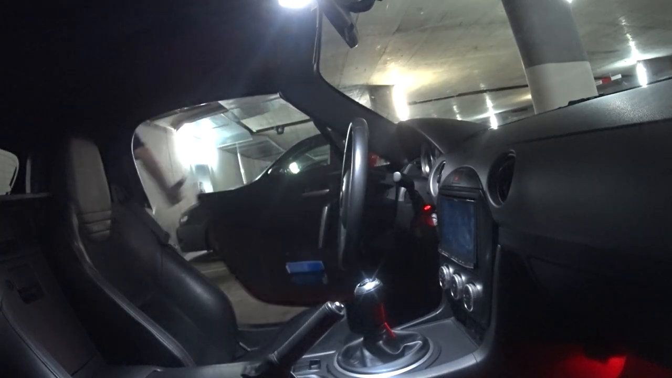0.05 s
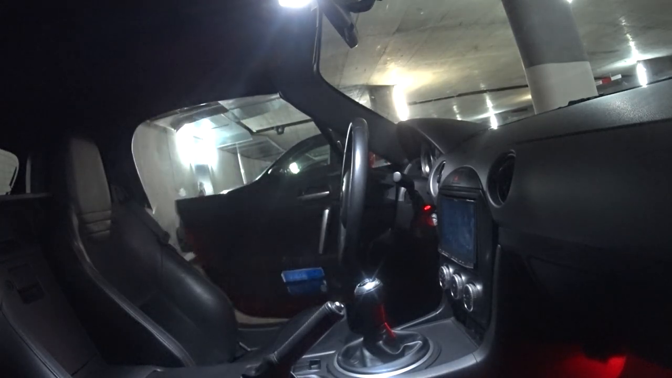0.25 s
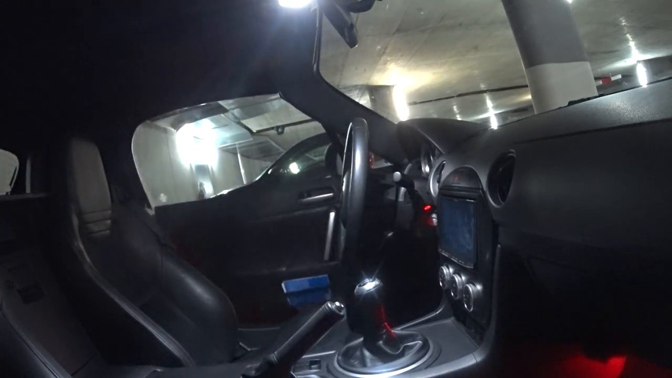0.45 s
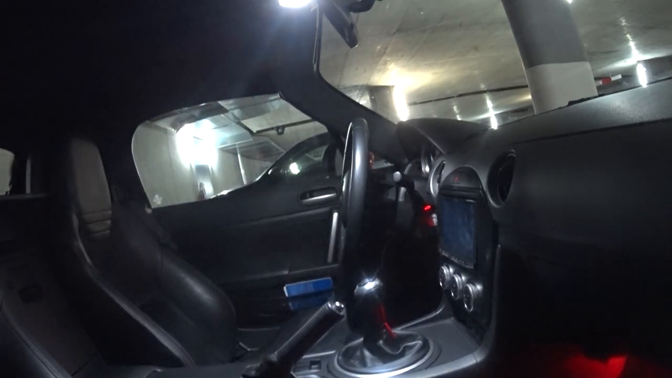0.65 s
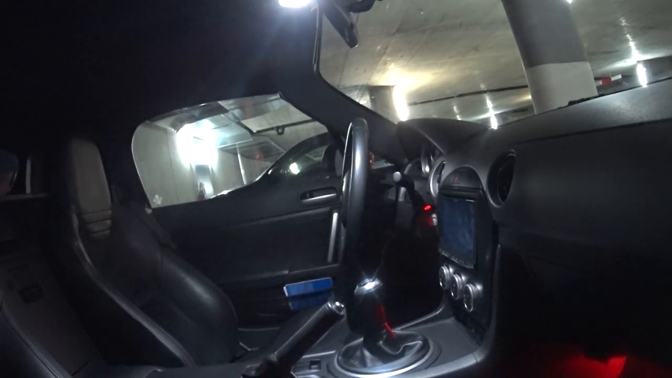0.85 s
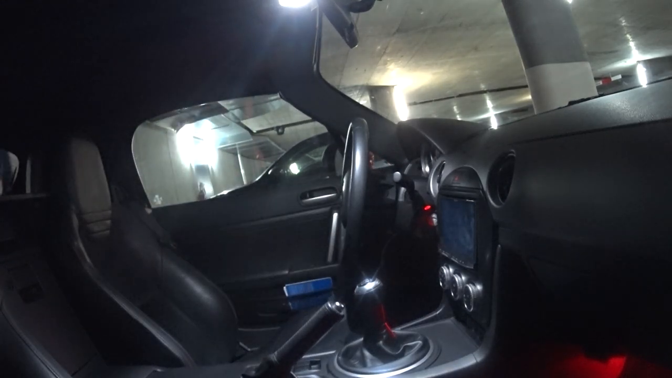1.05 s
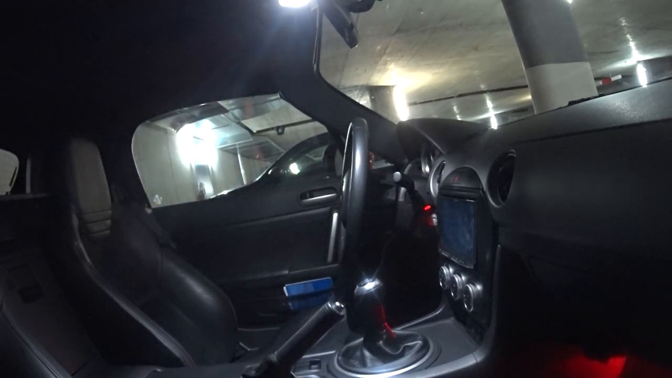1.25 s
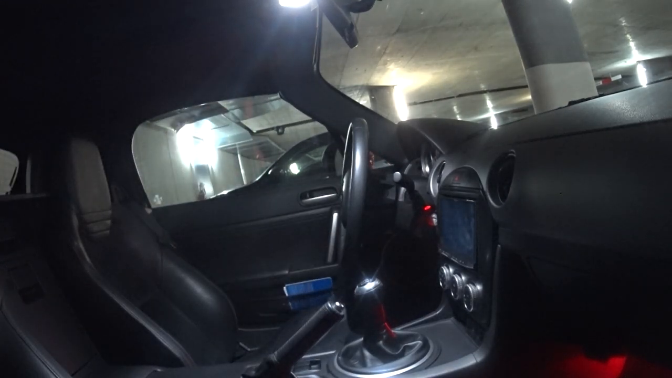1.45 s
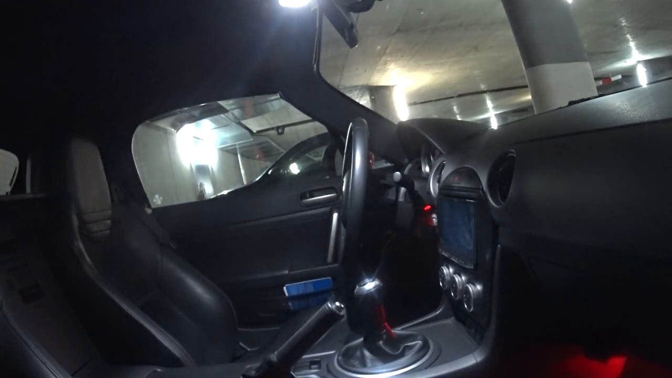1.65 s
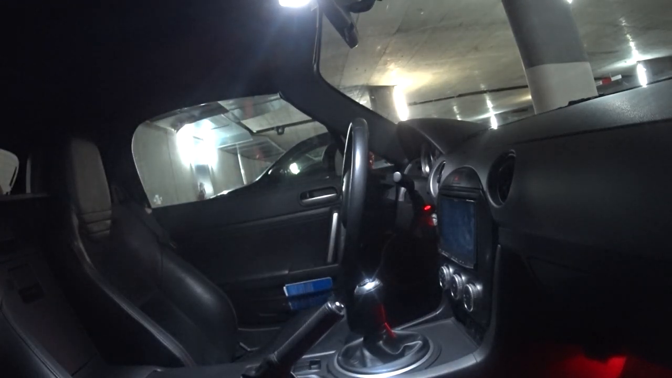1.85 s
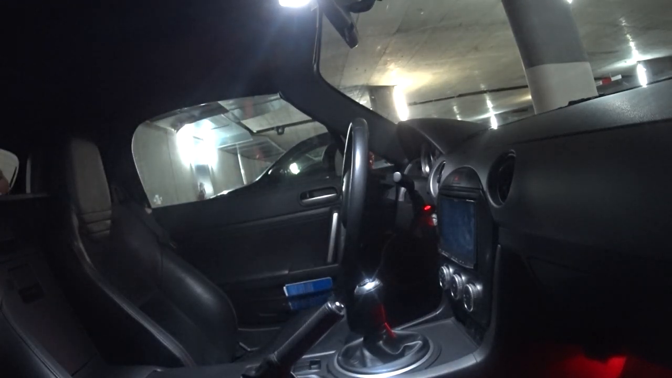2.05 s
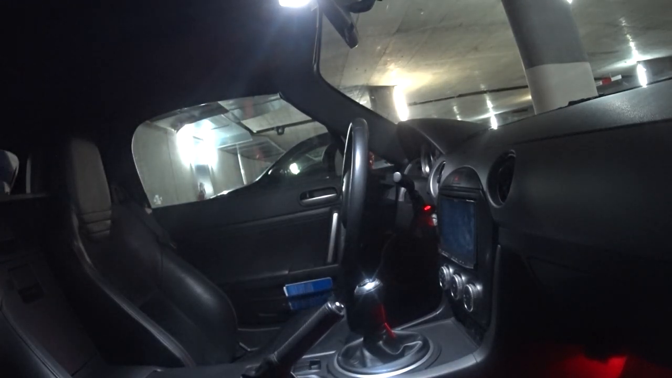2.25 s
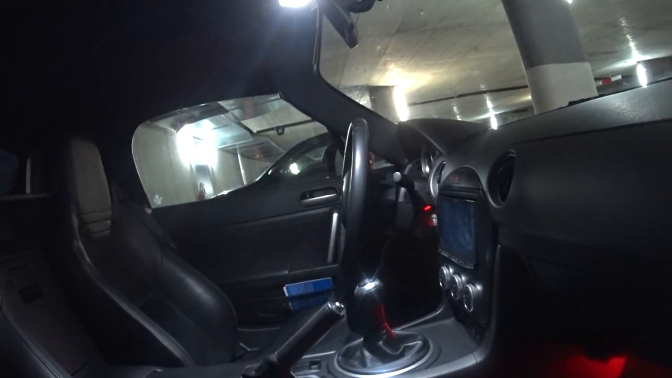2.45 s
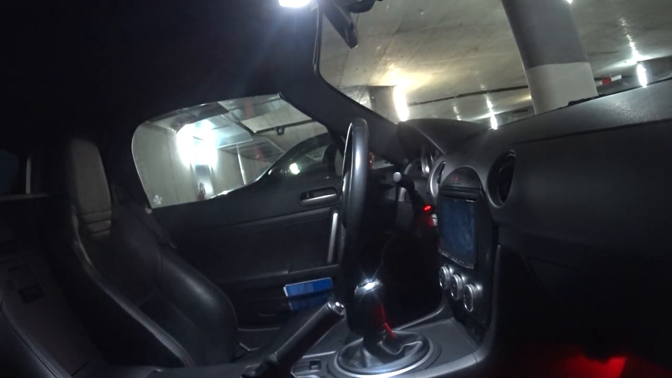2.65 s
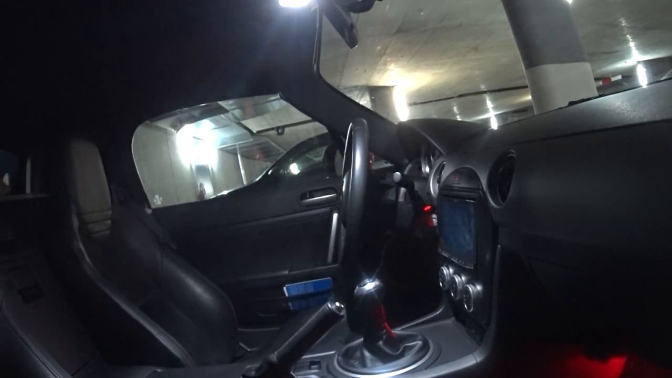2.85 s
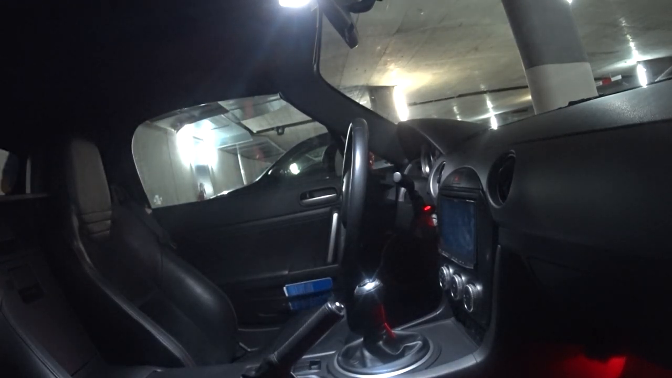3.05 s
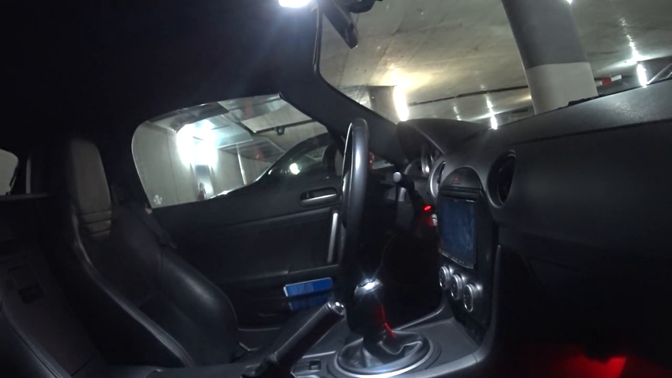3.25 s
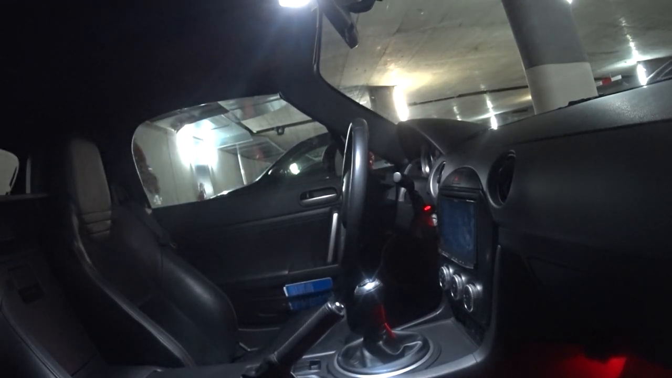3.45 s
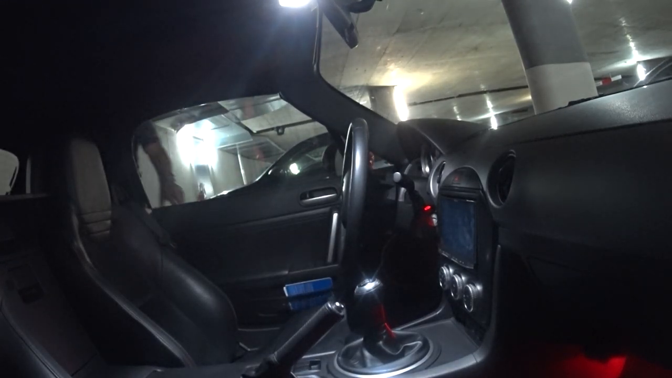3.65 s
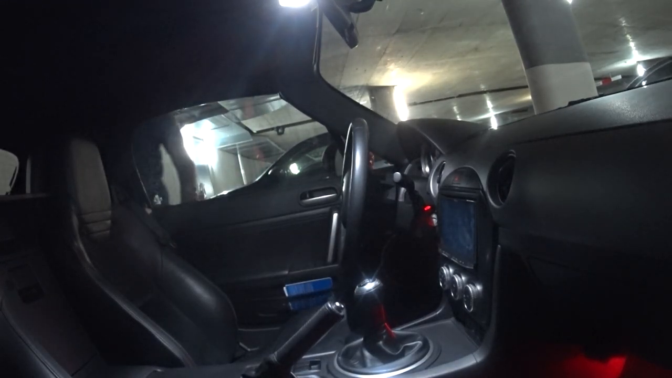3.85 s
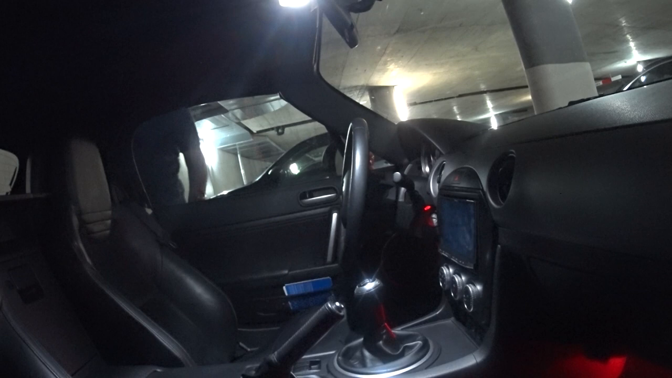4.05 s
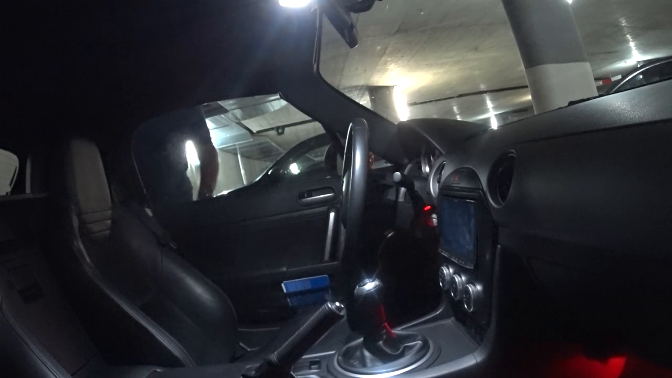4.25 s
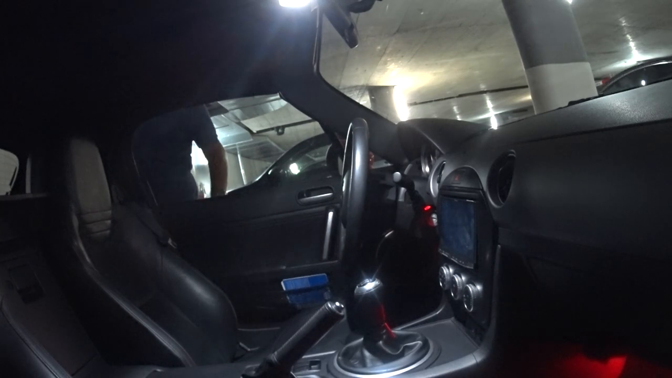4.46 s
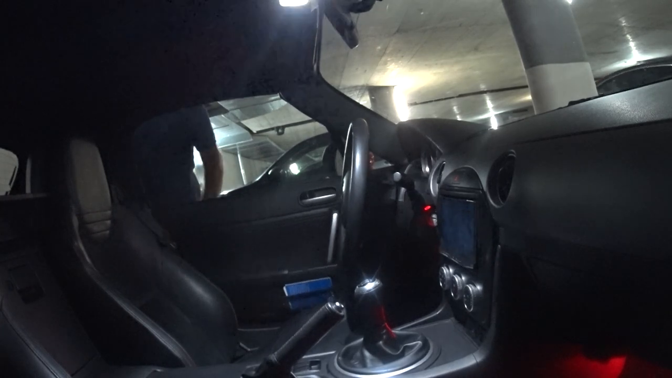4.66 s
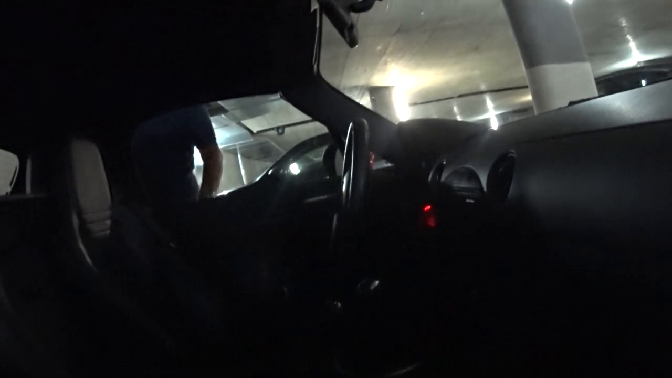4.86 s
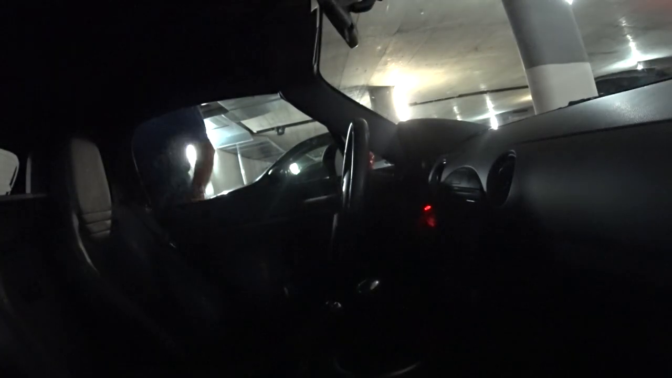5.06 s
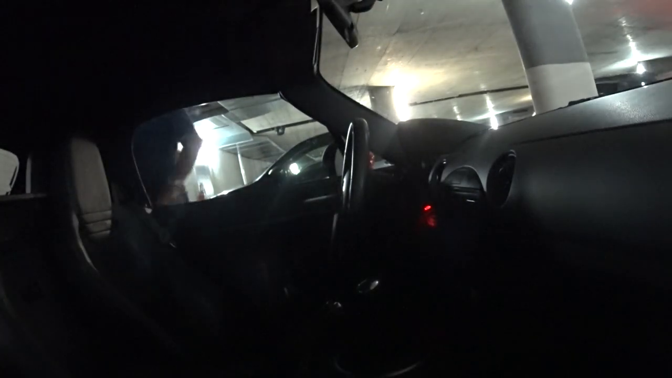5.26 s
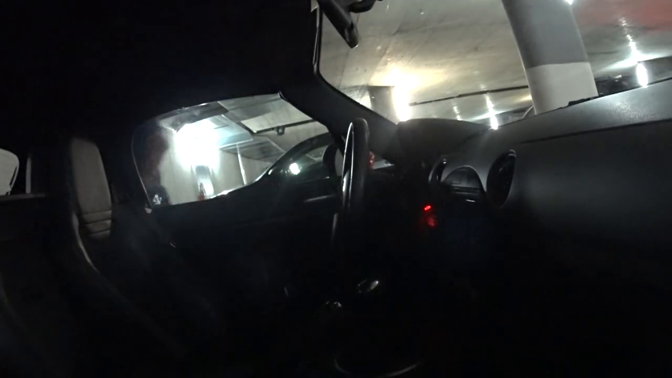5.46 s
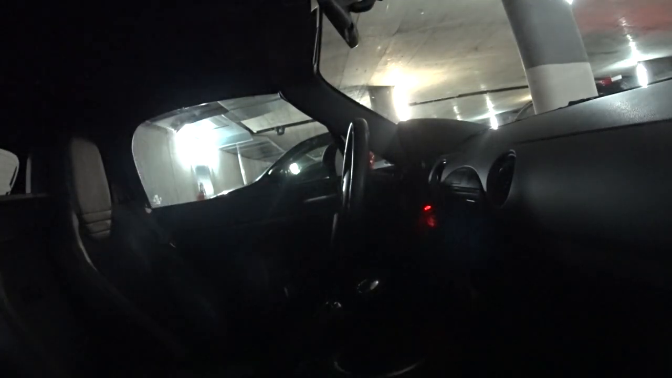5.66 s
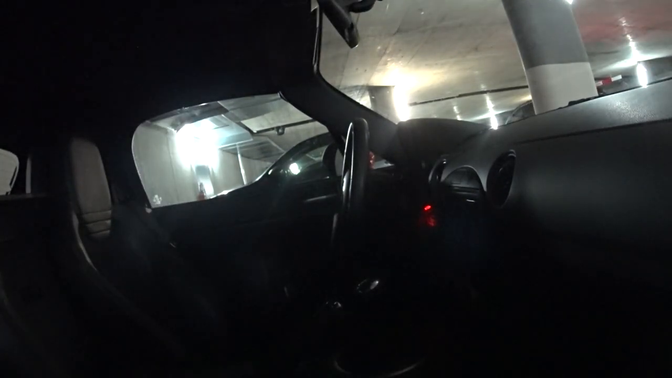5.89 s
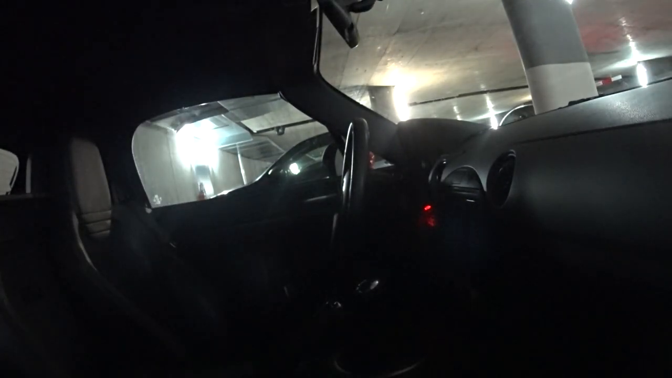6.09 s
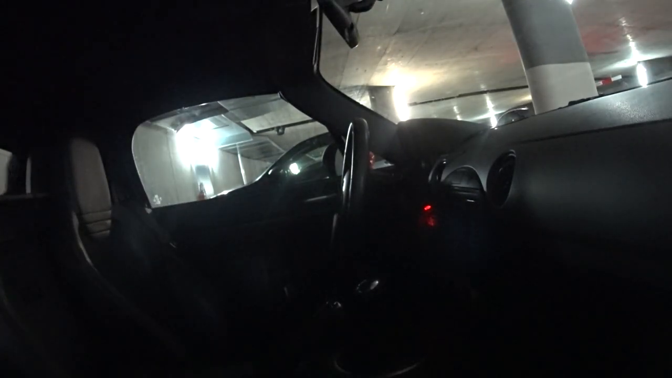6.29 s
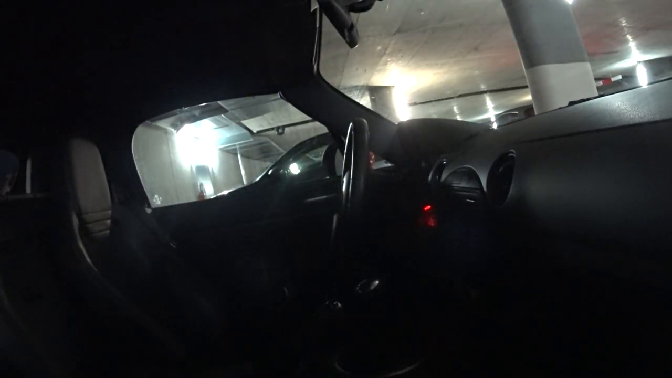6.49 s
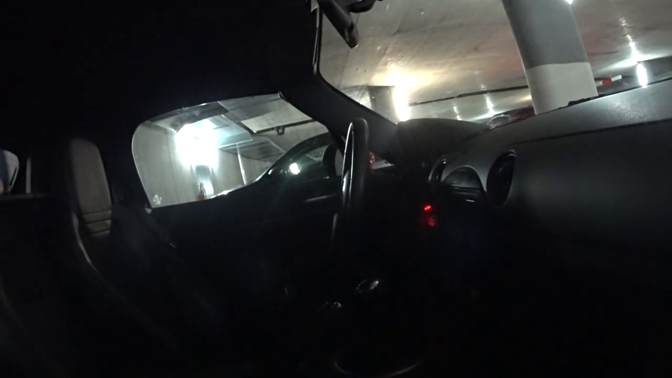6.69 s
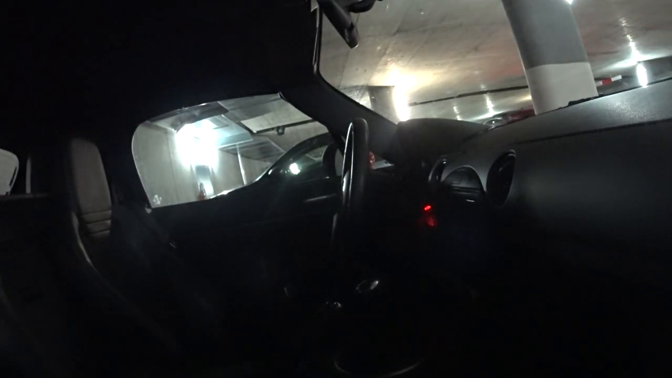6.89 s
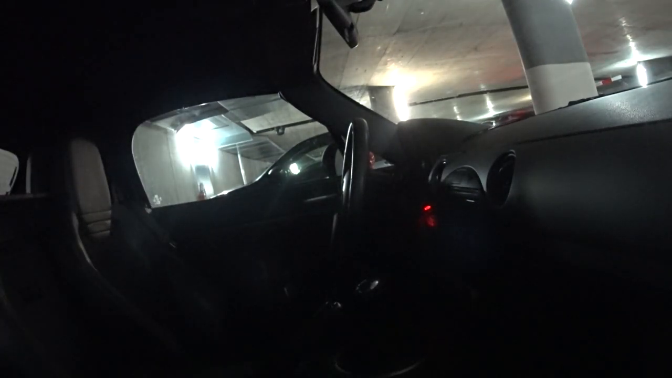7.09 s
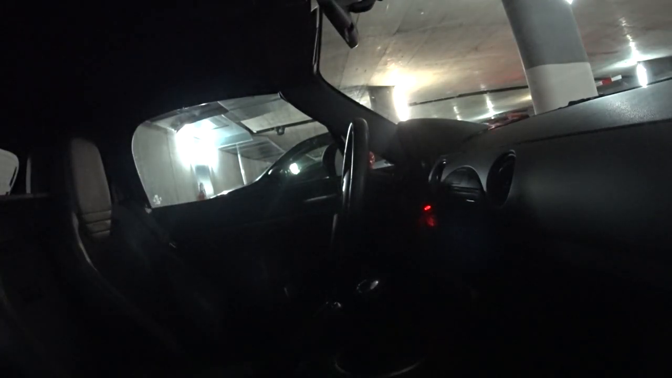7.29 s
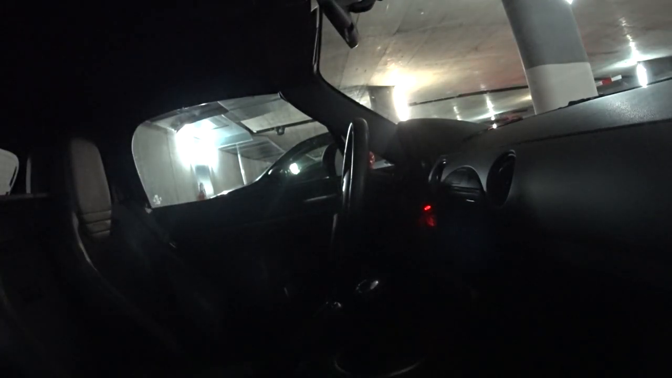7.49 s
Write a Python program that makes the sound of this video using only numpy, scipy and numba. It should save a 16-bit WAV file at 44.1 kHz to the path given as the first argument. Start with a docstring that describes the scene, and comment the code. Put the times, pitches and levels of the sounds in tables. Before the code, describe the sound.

From inside a parked car, the door thumps shut, clicks open and slams again while an engine hums nearby.

```python
"""A car door slams, is opened by its handle and slams again, heard from inside the car, parked in a garage.
Each contact thumps the cabin air, rings the door panel and rattles the latch; dull body knocks follow.
Garage noise leaks in, bright while the door is ajar, over the whine and hum of a car nearby.
A small two-port microphone picks it all up, and its limiter squashes the blows."""
import sys
import numpy as np
from scipy import signal
from scipy.fft import rfft, irfft
from scipy.io import wavfile
from scipy.ndimage import uniform_filter1d
from numba import njit

SR = 44100
rng = np.random.default_rng(int(sys.argv[2]) if len(sys.argv) > 2 else 0)


def store_wav(level_fs):
    """Save 16-bit WAV to argv[1]."""
    pcm = np.round(np.clip(np.atleast_2d(level_fs), -1, 1) * 32767)
    wavfile.write(sys.argv[1], SR, pcm.T.astype(np.int16))


N = 332073
T = np.arange(N) / SR
HZ = np.maximum(np.fft.rfftfreq(N, 1 / SR), 1)

# The slams. Each row: first touch and shudder length in seconds, air push and hard parts in dB.
SLAMS = [(0.515, 0.15, -9, -13.5), (4.663, 0.1, -6, -17.5)]
# Latch, seal and glass meeting in turn. Each row: start in seconds, relative panel level in dB,
# hard parts in dB above the fading shudder, pitch of the struck spot in Hz.
SLAM_CONTACTS = [(0.525, -9.5, -6, 822), (.534, -9.5, 1, 656), (0.548, -6.5, 2.5, 292), (.563, -13, 1, 405),
                 (.584, -10, -5.5, 250), (.594, -12, -1, 197), (0.607, -15, 1.5, 310), (.619, -9, 0.5, 200),
                 (0.632, -12.5, 1, 352), (.646, -4.5, 3, 190), (0.656, -12.5, -12, 477),
                 (.692, -17, -2.5, 201), (0.731, -21, -11, 203), (0.798, -28, 0, 199), (4.67, -14, -1, 783),
                 (4.676, -24, 8.5, 680), (4.686, -1, 5, 333), (4.697, -2, 8, 233), (4.706, -5, 9.5, 332),
                 (4.716, -20, 4, 400), (4.727, -0.5, -12, 248), (4.74, -3, 7, 224), (4.76, -10, 4, 408),
                 (4.798, -16, -11, 140.4), (4.833, -17, 0, 198), (4.871, -22, 6, 196)]
# The handle being worked, and dull knocks on the body. Each row: start in seconds, relative levels of
# panel, air push and clack in dB, contact length in seconds, pitch of the struck spot in Hz.
HANDLE_CONTACTS = [(3.964, -12, -42, -20.5, 0.0092, 295), (3.977, -14.5, -38, -26, .01, 412),
                   (4.012, -9, -30, -37, .03, 189), (4.276, -45, -45, -31.5, .008, 490),
                   (4.311, -19, -45, -24, 0.013, 408), (4.346, -7, -35, -36, 0.013, 257)]
BODY_KNOCKS = [(.038, -12, -46, -51, 0.015, 472), (5.753, -16.5, -28, -40, 0.0099, 305),
               (5.795, -6.5, -20, -24.5, 0.019, 450), (5.812, -7.5, -17, -36, 0.012, 164),
               (5.835, -15, -42, -54, 0.056, 139.6), (5.918, -18.5, -39, -55, 0.013, 633),
               (6.422, -13.5, -46, -34.5, 0.013, 272), (6.447, -26.5, -49, -44, 0.017, 318),
               (6.586, -21.5, -50, -42, 0.0095, 228), (6.609, -21.5, -50, -61, 0.013, 268),
               (6.665, -30, -51, -47, .025, 290)]
# Boom of the cabin air, ring of the door panel and ping of the latch claw.
# Each row: pitch in Hz, relative level in dB, time to fall 60 dB in seconds.
CABIN_MODES = [(28.1, 1.5, 0.5), (45.1, -3.5, 0.9), (61.4, 14, 0.12), (74.9, 14.5, 0.28), (85.6, 0, 0.41),
               (93.5, 5, 0.665), (111, 5.5, 0.35)]
PANEL_MODES = [(115, -14, 0.22), (146.1, -14.5, 1), (174, -25, 0.22), (212, 1, 0.061), (228.5, -4, 0.16),
               (288, 6, 0.072), (367, -1, 0.042), (397.3, 2, 0.12), (465, -1, 0.074), (554, -1, 0.097),
               (609, 6, 0.019), (833, -5, 0.048), (998, -8.5, 0.11)]
CLAW_MODES = [(1452, -6.5, 0.14), (1600, 0, 0.032), (3280, -3, 0.025), (4260, -5.5, 0.03),
              (4680, 0.5, 0.0084), (6150, -24, 0.011), (7350, -4, 0.015)]
# Clack of the door skin and rattle of the latch. Each row: centre and width in Hz, relative level in dB.
SKIN_BANDS = [(1040, 200, 4), (1523, 150, -0.5), (1620, 240, 5.5), (1766, 310, 6), (2205, 140, -4),
              (2590, 340, -14.5)]
LATCH_BANDS = [(3000, 3200, -4), (3720, 370, -2), (4600, 880, -1), (6060, 2200, 3.5), (8400, 2800, 0.5)]
# The latch claw snapping. Each row: start in seconds, click strength in dB.
CLAW_SNAPS = [(0.537, -20), (3.965, -27.5), (4.677, -12), (4.711, -17)]
# Seal squeaks. Each row: start and length in seconds, pitch in Hz, level in dB.
SEAL_SQUEAKS = [(0.59, 0.018, 9000, -31), (0.626, 0.009, 4670, -28)]
# The gap before each slam. Each row: times in seconds at which the door starts to open, stands wide and
# starts to close, then the level of the noise let in, in dB.
DOOR_AJAR = [(-.2, 0.04, 0.19, -46), (3.897, 4.211, 4.58, -44.5)]
# Background level as heard, a drawn curve: it drifts, ducks after each slam as the recorder's gain
# drops, then recovers. Each row: time in seconds, level in dB.
BACKGROUND_LEVEL = [(0.0, -33), (0.33, -38), (0.63, -34), (1.03, -41.5), (1.34, -40.5), (2.39, -33.5),
                    (3.02, -35.5), (4.01, -33), (4.21, -30.5), (4.65, -30), (4.89, -33.5), (5.1, -36),
                    (5.39, -38.5), (5.93, -36.5), (6.58, -36.5), (6.94, -38.5), (7.53, -38.5)]
# Garage noise through the body and through the gap. Each row: frequency in Hz, relative density in dB.
MUFFLED_SPECTRUM = [(15, -32), (25, -6), (49, -7.5), (65, -20.5), (139, -20), (205, -8.5), (325, -16),
                    (431, -11), (503, -15), (633, -12), (1330, -26), (1680, -25.5), (2530, -37.5),
                    (10400, -72), (11500, -103), (15000, -102), (22000, -120)]
GAP_SPECTRUM = [(15, -38), (25, -39), (54, -5), (117, -44), (279, -8), (1090, -21), (1860, -19.5),
                (2400, -29), (8670, -38.5), (10600, -45.5), (11500, -80), (15000, -95), (22000, -120)]
# A passing car's whine. Each row: time in seconds, pitch in Hz, tone and sheen levels in dB.
WHINE_PATH = [(1.449, 524.4, -65, -78), (1.577, 585, -40, -81), (1.749, 660, -45, -60),
              (1.9, 683, -42, -59), (2.3, 651, -66, -58.5), (2.701, 631, -43, -62),
              (3.1, 619.4, -36.5, -57), (3.5, 619, -41, -61), (3.9, 600.3, -44, -57.5),
              (4.2, 587, -61, -48), (4.55, 597, -58, -47), (4.68, 607, -60, -65)]
# Engine hum. Each row: time in seconds, pitch in Hz, firing tone and octave levels in dB.
HUM_PATH = [(0, 56.05, -37.5, -50), (.5, 55.33, -39, -49), (1.0, 42, -35, -52), (1.5, 41.15, -50, -51),
            (1.9, 39.1, -39, -48), (2.2, 39.15, -36.5, -39.5), (2.48, 40.5, -31, -46),
            (2.62, 39.96, -30.5, -40), (2.75, 39.5, -33.5, -61), (3.301, 37.06, -35, -51),
            (3.9, 41.7, -41, -55), (4.1, 49.6, -31, -54), (4.2, 54.9, -37, -59), (4.45, 55.22, -29.5, -66),
            (4.619, 46.5, -39, -50), (5.3, 37.04, -40, -50), (5.731, 38.76, -32.5, -49),
            (6.2, 41, -32.5, -48), (6.8, 40.8, -50.5, -52), (7.18, 41.2, -35, -79), (7.53, 44.2, -37, -57)]
# Stereo balance of door and background. Each row: frequency in Hz, left minus right in dB.
DOOR_BALANCE = [(60, -3), (110, -6), (190, -11.5), (350, -5), (620, -4), (1120, -2), (2000, 1.5), (3600, 0),
                (6450, 0), (11600, -1)]
BACKGROUND_BALANCE = [(60, -5.5), (110, 1), (190, -5.5), (350, -2.5), (620, -4.5), (1120, -3.5), (2000, 2),
                      (3600, 0.5), (6450, 0.5), (11600, 0.0)]
# Stereo phase of door and background. Each row: frequency in Hz, lead of the left side in radians.
DOOR_PHASE = [(25, 1.9), (120, 0.32), (500, 1.09), (1600, 1.13), (3300, 0.8), (6000, 0.53), (11000, 0.35)]
BACKGROUND_PHASE = [(30, 0), (400, 0.61), (1200, 0.025), (2500, 0.75), (4500, 0.17), (11000, 0.89)]
# Width of the noise at the two ports. Each row: frequency in Hz, likeness from 0 (wide) to 1 (alike).
PORT_LIKENESS = [(60, 1), (130, 1), (270, 0.9), (570, 0.31), (1210, 0.19), (2570, 0.33), (5460, 0.35),
                 (11600, 1)]

AIR_RISE_S, AIR_START_DB = 0.046, -17  # a slam's air push builds from below
AIR_FALL_DB, CLACK_FALL_DB, RATTLE_FALL_DB = -18, -16.5, -17  # per shudder length
SLAM_RATTLE_DB, HANDLE_RATTLE_DB, KNOCK_RATTLE_DB = -5, -7, -23  # latch drive against clack drive
SLAM_CONTACT_S, SLAM_CLACK_S, KNOCK_CLACK_S = 0.011, 0.012, 0.027  # knocks from outside clack longer
CABIN_T60_S, CABIN_DB = 0.08, -8
SWISH_DB, SWISH_RISE_S, SWISH_FADE = -39.5, 0.015, 0.85  # fade in shudder lengths
GAP_OPENING_DB, GAP_CLOSING_DB = -11, -9.5  # barely open against wide open
HISS_DB, HISS_AT_BACKGROUND_DB, HISS_FOLLOW = -61.5, -37, 0.58  # share of the background's dB swings
FLICKER_DB = 2
LIMIT_DB, RELEASE_S, TOP_HZ = -3, 0.025, 11050


def door():
    """Slams, handle and knocks, heard directly and as a short cabin tail that differs on each side."""
    rows = slam_rows() + knock_rows(HANDLE_CONTACTS, HANDLE_RATTLE_DB)
    rows += knock_rows(BODY_KNOCKS, KNOCK_RATTLE_DB, KNOCK_CLACK_S)
    boom, body = contacts(rows)
    _, body_side = contacts(rows)  # fresh grit for stereo width
    body = body + claw_snaps() + seal_squeaks()
    t = T[:SR // 2]
    tails = rng.standard_normal((2, len(t))) * undb(-60 * t / CABIN_T60_S)
    reverb = np.array([signal.fftconvolve(body, h / np.sqrt(np.sum(h ** 2)))[:N] for h in tails])
    late_boom = np.roll(boom, 300)  # the cabin air also arrives by a slightly longer path
    return (ports(boom, late_boom, 0.76, DOOR_BALANCE, DOOR_PHASE)
            + ports(body, body_side, 0.93, DOOR_BALANCE, DOOR_PHASE) + undb(CABIN_DB) * reverb)


def slam_rows():
    """A slam is a shudder of contacts: the air push builds, holds and falls while the hard parts fade."""
    rows = []
    for start, panel_db, hard_db, spot_hz in SLAM_CONTACTS:
        touch, shudder_s, air_db, slam_db = [slam for slam in SLAMS if slam[0] <= start][-1]
        late = start - touch
        air_db += AIR_START_DB * max(1 - late / AIR_RISE_S, 0)
        air_db += AIR_FALL_DB * max(late / shudder_s - 1, 0)
        clack_db = slam_db + hard_db + CLACK_FALL_DB * late / shudder_s
        rattle_db = slam_db + hard_db + SLAM_RATTLE_DB + RATTLE_FALL_DB * late / shudder_s
        rows.append((start, panel_db, air_db, clack_db, rattle_db, SLAM_CONTACT_S, spot_hz, SLAM_CLACK_S))
    return rows


def knock_rows(table, rattle_db, clack_s=0):
    """Lone blows: each shakes the latch a set step softer than the skin."""
    return [(start, panel_db, air_db, clack_db, clack_db + rattle_db, length, hz, max(length, clack_s))
            for start, panel_db, air_db, clack_db, length, hz in table]


def contacts(rows):
    """Each contact gives the cabin air a soft push, the panel a rough one, and skin and latch a bite."""
    push, rough, clack, grit, thud = np.zeros((5, N))
    t = T[:SR // 4]
    soft = t * np.exp(-t / 0.004)
    for start, panel_db, air_db, clack_db, rattle_db, length, spot_hz, clack_s in rows:
        at = slice(int(start * SR), int(start * SR) + len(t))
        panel_noise, hard_noise = rng.standard_normal((2, len(t)))
        push[at] += undb(air_db) * soft / soft.sum()
        blow = undb(panel_db - 3.5) * np.exp(-t / length) * np.minimum(t / (0.31 * length), 1)
        rough[at] += blow * panel_noise / np.sqrt(length * SR)
        # the struck spot gives a damped note, the hollow behind the trim another
        thud[at] += blow * (np.sin(2 * np.pi * spot_hz * t) + 0.21 * np.sin(2 * np.pi * 700 * t))
        bite = np.exp(-(t / clack_s) ** 1.2) * np.minimum(t / 0.003, 1) * hard_noise
        clack[at] += undb(clack_db) * bite
        grit[at] += undb(rattle_db) * bite
    boom = undb(-6) * ring_modes(push, CABIN_MODES)
    panel = undb(-6) * ring_modes(lowpass(rough, order=2, hz=1500), PANEL_MODES)  # a padded blow
    skin = undb(-1.5) * ring_bands(lowpass(clack, order=6, hz=3100), SKIN_BANDS)
    latch = undb(1.5) * ring_bands(grit, LATCH_BANDS)
    return boom, thud + panel + skin + latch


def claw_snaps():
    """Steel on steel: a click sets the latch claw ringing briefly."""
    clicks = np.zeros(N)
    for start, db in CLAW_SNAPS:
        clicks[int(start * SR)] = undb(db)
    return ring_modes(clicks, CLAW_MODES)


def seal_squeaks():
    """Short, thin whistles of rubber sliding on paint."""
    out = np.zeros(N)
    for start, length, hz, db in SEAL_SQUEAKS:
        arch = np.sin(np.pi * np.clip((T - start) / length, 0, 1))
        out += undb(db) * np.sin(2 * np.pi * hz * T) * np.clip(4.6 * arch, 0, 1)
    return out


def seal_swish():
    """Air hisses past the seal just before the door meets it and dies away after."""
    swell = sum(np.exp(np.minimum((T - touch) / SWISH_RISE_S, (touch - T) / (SWISH_FADE * shudder_s)))
                for touch, shudder_s, _, _ in SLAMS)
    air = noise_bed([(1500, 0), (4000, -3), (8000, -1), (11000, -5)], lo_hz=3000, hi_hz=11000)
    return undb(SWISH_DB) * swell * air


def garage():
    """A muffled bed and a thin hiss throughout; bright noise spills in while the door is ajar."""
    level_db = np.interp(T, *np.transpose(BACKGROUND_LEVEL))
    out = undb(level_db) * noise_bed(MUFFLED_SPECTRUM, lo_hz=141, hi_hz=1050, flicker_db=-1)
    bright = noise_bed(GAP_SPECTRUM, lo_hz=2780, hi_hz=11000)
    for (opens, wide, closes, db), (shut, *_) in zip(DOOR_AJAR, SLAMS):
        gap_db = np.interp(T, [opens, wide, closes, shut], [GAP_OPENING_DB, 0, 0, GAP_CLOSING_DB])
        out += undb(db + gap_db) * ((T > opens) & (T < shut)) * bright
    hiss_spectrum = [(1500, -5), (3000, 4), (3600, 3.5), (4800, 2), (6100, 0), (11000, -5)]
    hiss = noise_bed(hiss_spectrum, lo_hz=3650, hi_hz=11900)
    return out + undb(HISS_DB + HISS_FOLLOW * (level_db - HISS_AT_BACKGROUND_DB)) * hiss


def car_whine():
    """A passing car: a breathy tone that slides a little, with a hissy sheen far above it."""
    times, hz, *levels_db = np.transpose(WHINE_PATH)
    tone_gain, sheen_gain = (undb(np.interp(T, times, db, -120, -120)) for db in levels_db)
    phase = 2 * np.pi * np.cumsum(np.interp(T, times, hz)) / SR
    layers = []
    for _ in range(2):
        tone = (1 + 0.6 * wander(60)) * np.sin(phase) + 0.6 * wander(60) * np.cos(phase)
        sheen = ring_bands(rng.standard_normal(N), [(3450, 280, 5), (5800, 400, -4)])
        layers.append(tone_gain * tone + sheen_gain * sheen / np.sqrt(np.mean(sheen ** 2)))
    return ports(*layers, 0.75)


def engine_hum():
    """An engine's wavering firing tone and its octave."""
    times, *columns = np.transpose(HUM_PATH)
    hz, firing_db, octave_db = (np.interp(T, times, column) for column in columns)
    phase = 2 * np.pi * np.cumsum(hz * (1 + 0.023 * wander(7.3))) / SR
    firing = undb(firing_db + 0.5 * wander(3.625)) * np.sin(phase)
    octave = undb(octave_db + FLICKER_DB * wander(16)) * np.sin(2 * phase)
    hum = np.sqrt(2) * (firing + octave)
    return ports(hum, hum, 0.98)


def noise_bed(spectrum, lo_hz, hi_hz, flicker_db=FLICKER_DB):
    """Stereo noise shaped by (Hz, dB) points, its centre at 0 dB between lo_hz and hi_hz."""
    mid, side = (flickering_noise(spectrum, flicker_db) for _ in range(2))
    bed = ports(mid, side, over_hz(PORT_LIKENESS) ** 0.87)
    band = np.abs(rfft(bed.mean(axis=0))[(HZ > lo_hz) & (HZ < hi_hz)])
    return bed * N / np.sqrt(2 * np.sum(band ** 2))


def flickering_noise(spectrum, flicker_db):
    """Coloured noise whose octaves each flicker on their own, the treble least."""
    bins = rfft(rng.standard_normal(N)) * undb(over_hz(spectrum))
    octave = np.clip(np.log2(HZ / 40), 0, 8)
    out = np.zeros(N)
    for k in range(9):
        share = np.clip(1 - np.abs(octave - k), 0, 1)
        out += irfft(bins * share, N) * undb(flicker_db * (1 - k / 9) * wander(6))
    return out


def ports(mid, side, likeness, balance=BACKGROUND_BALANCE, lead=BACKGROUND_PHASE):
    """The microphone's two ports hear mid plus and minus side, each with its own tilt and phase."""
    likeness = np.clip(likeness, 0, 1)
    mid = np.sqrt((1 + likeness) / 2) * rfft(mid)
    side = np.sqrt((1 - likeness) / 2) * rfft(side)
    pan = undb(over_hz(balance) / 2) * np.exp(1j * over_hz(lead) / 2)
    return np.array([irfft((mid + side) * pan, N), irfft((mid - side) / pan, N)])


@njit
def ring(x, hz, t60):
    """One decaying mode, driven by x."""
    y, state = np.empty(len(x)), 0j
    pole = np.exp(2j * np.pi * hz / SR - np.log(1000) / (t60 * SR))
    for i in range(len(x)):
        state = state * pole + x[i]
        y[i] = state.imag
    return y


def ring_modes(x, modes):
    """A part ringing in all its modes at once."""
    return sum(undb(db) * ring(x, float(hz), t60) for hz, db, t60 in modes)


def ring_bands(x, bands):
    """Short rings: the wider the band, the faster it dies."""
    return sum(undb(db) * np.sqrt(width / SR) * ring(x, float(hz), np.log(1000) / (np.pi * width))
               for hz, width, db in bands)


def wander(rate_hz):
    """Smooth random drift with a spread near 1."""
    hold = int(SR / rate_hz)
    steps = np.repeat(rng.standard_normal(N // hold + 1), hold)
    return 1.3 * uniform_filter1d(uniform_filter1d(steps, hold), hold)[:N]


def lowpass(x, order, hz):
    """Dull the sound above hz."""
    return signal.sosfilt(signal.butter(order, hz, fs=SR, output="sos"), x)


def over_hz(table):
    """A (Hz, value) curve read at every frequency bin."""
    hz, values = np.transpose(table)
    return np.interp(np.log(HZ), np.log(hz), values)


def undb(db):
    """Decibels to gain."""
    return 10 ** (np.asarray(db) / 20)


@njit
def limit(x, ceiling, release):
    """One gain for both channels: ducks at once on a peak, then recovers."""
    y, peak = np.empty_like(x), 0.
    for i in range(x.shape[1]):
        peak = max(abs(x[0, i]), abs(x[1, i]), peak * release)
        y[:, i] = x[:, i] * min(1., ceiling / (peak + 1e-9))
    return y


def scene():
    """The door and its swish up front; the garage and the nearby car behind."""
    return door() + garage() + car_whine() + engine_hum() + seal_swish()


def record(dry):
    """The microphone chain trims the deepest bass, limits the blows and cuts the top."""
    x = signal.sosfilt(signal.butter(2, 22, "high", fs=SR, output="sos"), dry)
    x = limit(x, float(undb(LIMIT_DB)), np.exp(-1 / (RELEASE_S * SR)))
    return signal.sosfilt(signal.ellip(10, 0.2, 60, TOP_HZ, fs=SR, output="sos"), x)


dry = scene()
out = record(dry)
store_wav(out)
```